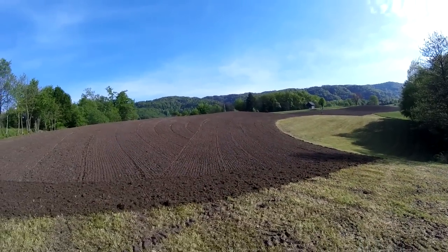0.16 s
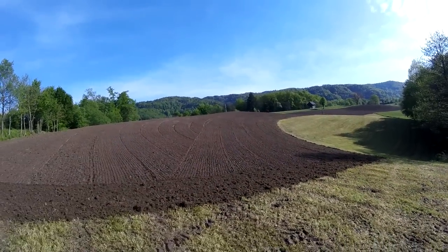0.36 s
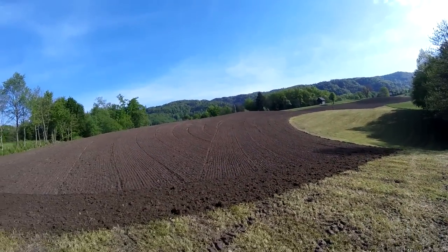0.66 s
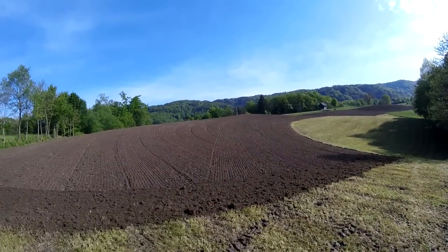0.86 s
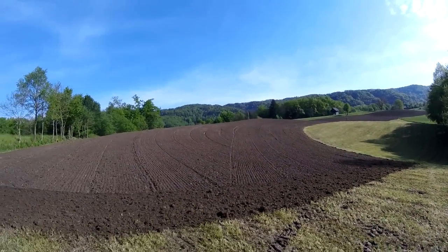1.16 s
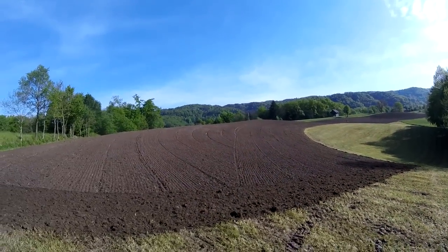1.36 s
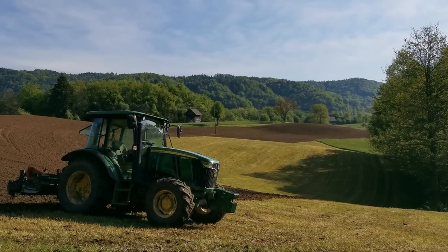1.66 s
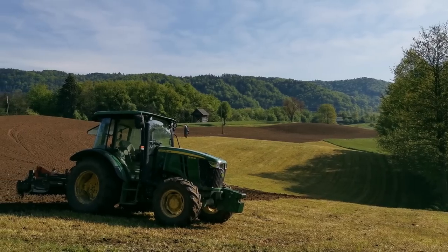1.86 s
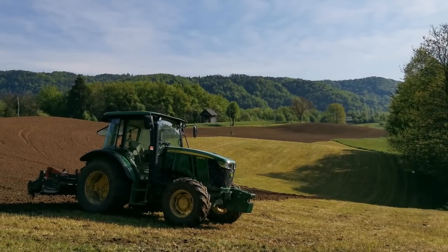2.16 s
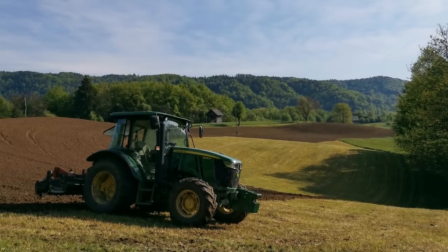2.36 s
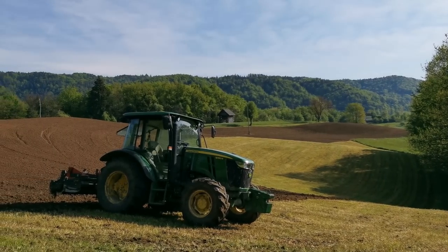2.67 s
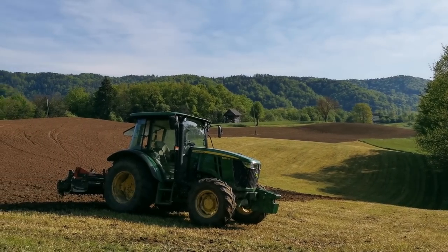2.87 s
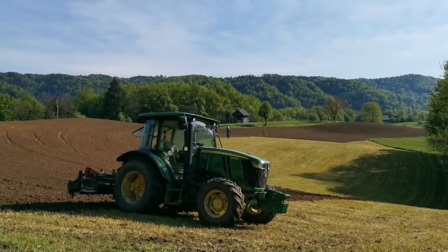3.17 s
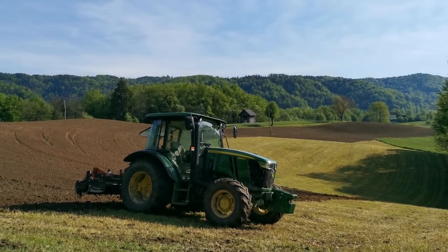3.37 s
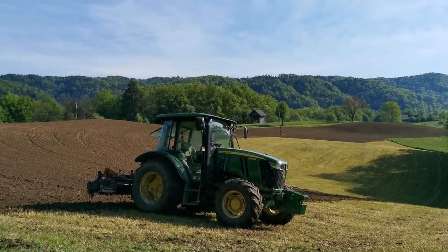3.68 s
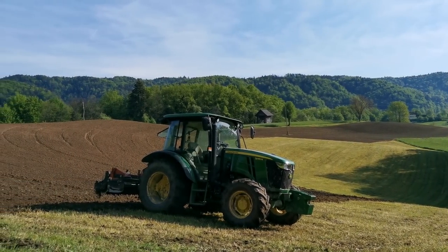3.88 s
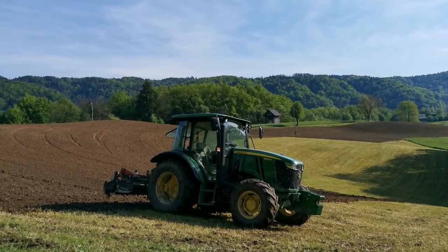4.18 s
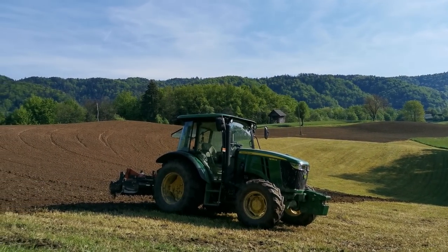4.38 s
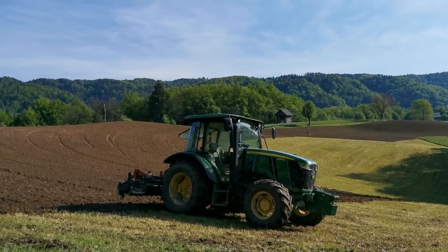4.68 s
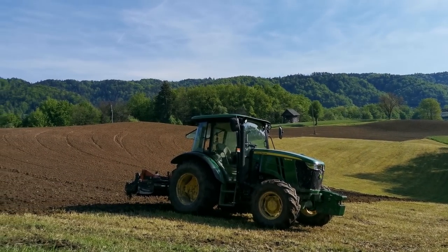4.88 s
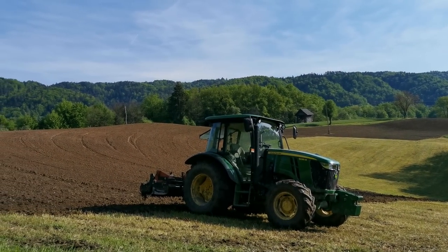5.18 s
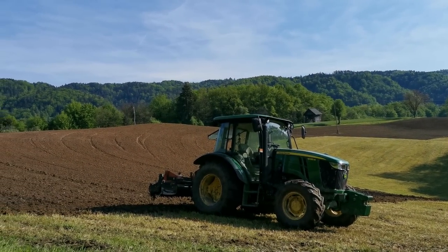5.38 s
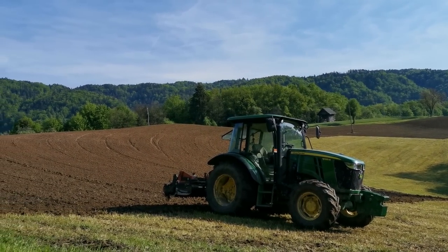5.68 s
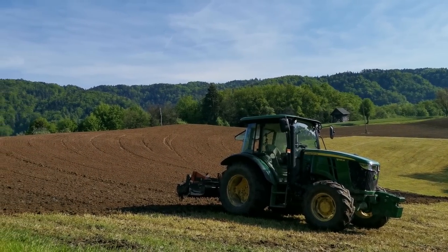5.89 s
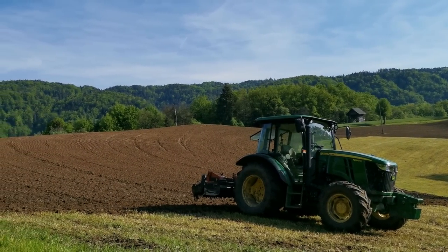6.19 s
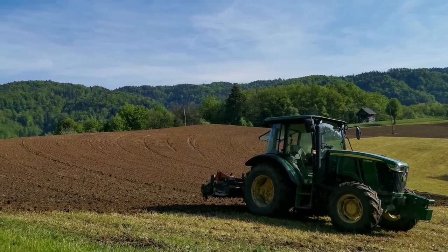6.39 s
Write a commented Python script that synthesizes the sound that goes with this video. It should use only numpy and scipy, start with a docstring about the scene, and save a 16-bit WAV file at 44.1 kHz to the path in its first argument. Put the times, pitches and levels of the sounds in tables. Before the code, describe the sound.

In an open field, a diesel tractor pulls a harrow close to the microphone, its exhaust droning and engine roaring, with a gear whine, a faint turbo whistle and a little wind rumble. After about a second and a half, the sound cuts from mono to stereo. The tractor now idles farther off, quieter, with puffing exhaust, fine ticking and a ringing knock, creeping slightly to the right.

```python
"""An open field, where a four-cylinder diesel tractor is heard in two scenes.
First it pulls a harrow close by, in mono: the exhaust drones, the engine roars with every firing,
gear teeth whine, the turbocharger whistles and a little wind rumbles.
Then, abruptly, it idles farther off, in stereo, creeping past to the right: the exhaust puffs,
the fuel injectors tick, and the burning fuel knocks in a ringing clatter."""
import sys
import numpy as np
from scipy import signal
from scipy.fft import rfft, irfft, next_fast_len
from scipy.io import wavfile
from scipy.ndimage import map_coordinates

SR = 44100
rng = np.random.default_rng(int(sys.argv[2]) if len(sys.argv) > 2 else 0)


def materialize(psi):
    """Save the field psi as 16-bit PCM at rate SR to the path in sys.argv[1].

    A 1-D psi becomes a single channel; in a 2-D psi each row is a channel.
    """
    bounded = np.clip(np.atleast_2d(psi).T, -1, 1)
    quanta = np.round(bounded * 32767).astype(np.int16)
    wavfile.write(sys.argv[1], SR, quanta)


N = 288414
SWITCH_S = 1.458  # the working engine gives way to the idling one
LOAD_HZ, IDLE_HZ = 51.1, 30.0  # firings a second

# how hard each of the four cylinders fires: level/dB
CYLINDER_LEVELS = [-0.19, 0.27, -0.28, -0.26]
# ring of an injector needle snapping shut: f/Hz, width/Hz, level/dB
NEEDLE_MODES = [(9300, 900, 0), (10800, 1300, -4), (12700, 1800, -9)]


def amp(db):
    """Turn decibels into a gain."""
    return 10 ** (np.asarray(db) / 20)


def unit(x):
    """Scale x to an average size (rms) of 1."""
    return x / np.sqrt(np.mean(x ** 2) + 1e-20)


def along(points, hz):
    """Read between (f/Hz, value) points on a log frequency axis."""
    f, values = np.transpose(points)
    return np.interp(np.log(hz + 1), np.log(f + 1), values)


def clock():
    """The time of every sample, in seconds."""
    return np.arange(N) / SR


def wobble(rate):
    """A smooth curve through rate random values a second."""
    return map_coordinates(rng.standard_normal(int(N * rate / SR) + 4), [clock() * rate])


def gate(start, length, edge):
    """A gain that rises for edge seconds before start, holds for length, then falls."""
    t = clock() - start
    return np.clip(1 + np.minimum(t, length - t) / edge, 0, 1)


def bump(at_s, span_s):
    """A bell curve in time, like a beam of sound sweeping past the listener."""
    return np.exp(-((clock() - at_s) / span_s) ** 2)


def filtered(x, response):
    """Scale each frequency in x by response(hz)."""
    size = next_fast_len(N + SR // 2)
    return irfft(rfft(x, size) * response(np.fft.rfftfreq(size, 1 / SR)), size)[..., :N]


def coloured(x, spectrum):
    """Shape x with a (f/Hz, level/dB) curve, then scale it to rms 1."""
    return unit(filtered(x, lambda hz: amp(along(spectrum, hz))))


def above(hz, corner_hz):
    """The share of power that passes a steep filter which cuts the lows."""
    return 1 / (1 + (corner_hz / (hz + 1)) ** 8)


def resonance(f, hz, width):
    """How one mode (a ringing pitch, hz) responds at the frequencies f."""
    return 1j * f * width / (hz * hz - f * f + 1j * f * width)


def ringing(x, modes):
    """x plus the ring it stirs up in the modes."""
    return filtered(x, lambda f: 1 + sum(amp(db) * resonance(f, hz, width) for hz, width, db in modes))


def whine(hz, width):
    """A fuzzy tone: a narrow band of noise around hz."""
    angle = 2 * np.pi * hz * clock()
    return wobble(width) * np.cos(angle) + wobble(width) * np.sin(angle)


def stereo(pair):
    """Blend two unrelated signals so the ears hear alike in the bass, apart in the treble."""
    # how alike the ears are: f/Hz, likeness (1 = the same)
    likeness = [(100, 1), (700, 1), (1300, 0.9), (2400, 0.41), (3500, 0.22), (4500, 0.43), (8000, 0)]
    turn = lambda hz: np.arccos(np.clip(along(likeness, hz), -1, 1)) / 2
    mid, side = filtered(pair, lambda hz: np.array([np.cos(turn(hz)), np.sin(turn(hz))]))
    return np.array([mid + side, mid - side])


def vibration(firing, repeat, count=4):
    """Noise whose metallic part partly repeats every count firings; firing is the running count."""
    size = int(count * N / (firing[-1] - firing[0]))
    pattern = map_coordinates(rng.standard_normal(size), [firing % count / count * size],
                              mode="grid-wrap")
    share = lambda hz: np.clip(repeat, 0, 1) * above(hz, corner_hz=440)
    fresh = filtered(rng.standard_normal(N), lambda hz: np.sqrt(1 - share(hz)))
    return filtered(pattern, lambda hz: np.sqrt(share(hz))) + fresh


def blows(firing, scatter_db):
    """The strength of each firing, set by its cylinder and by chance."""
    number = np.floor(firing + .5).astype(int)
    size_db = np.resize(CYLINDER_LEVELS, 512) + scatter_db * rng.standard_normal(512)
    return amp(size_db[number])


def stroke(firing, onset, rise, decay, floor_db):
    """A gain that rises at each firing, then fades toward a floor; times are in firing periods."""
    age = (firing - onset) % 1
    pulse = lambda a: np.minimum(a / rise, 1) * np.exp(-np.maximum(a - rise, 0) / decay)
    return np.sqrt(pulse(age) ** 2 + pulse(age + 1) ** 2 + amp(floor_db) ** 2)


def struck(envelope, modes):
    """Ringing metal: noise tuned to the modes, as loud as the envelope says."""
    power = lambda f: sum(amp(db) ** 2 * abs(resonance(f, hz, width)) ** 4 for hz, width, db in modes)
    noise = stereo(rng.standard_normal((2, N)))
    return envelope * unit(filtered(noise, lambda f: np.sqrt(power(f))))


def strikes(firing, cylinder_db, modes, onset, rise_s, t60):
    """One strike on metal per idle firing, fading at a rate of 60 dB in t60 seconds."""
    number, age = np.divmod(firing - onset, 1)
    age_s = age / IDLE_HZ
    size_db = np.resize(cylinder_db, 512) + 1.5 * rng.standard_normal(512)
    fade = amp(size_db[number.astype(int) + 1] - 60 * age_s / t60)
    return unit(struck(fade * np.minimum(age_s / rise_s, 1), modes))


def impacts(rows, modes, t60, rise_s=.0006):
    """Single (t/s, level/dB) blows on metal that rise suddenly and die away."""
    t = clock()
    envelope = sum(amp(db - 60 * np.maximum(t - s, 0) / t60) * np.clip((t - s) / rise_s, 0, 1)
                   for s, db in rows)
    return struck(envelope, modes)


def air():
    """A faint hiss over the field, and a light breeze that differs from ear to ear."""
    # colour of the breeze: f/Hz, level/dB
    breeze = [(10, -8), (30, -3), (90, 10), (200, -19), (800, -52)]
    hiss = amp(-67.5) * rng.standard_normal((2, N))
    return hiss + amp(-56.5) * coloured(rng.standard_normal((2, N)), breeze)


def wind():
    """Moving air makes a low, wavering rumble."""
    # colour of the wind: f/Hz, level/dB
    rumble = [(5, -20), (14, -1), (30, -7), (50, -6), (100, -38), (400, -73)]
    return amp(-33 + wobble(1.5)) * coloured(rng.standard_normal(N), rumble)


def shafts():
    """Turning shafts give off weak, wavering whines."""
    # the whines: f/Hz, width/Hz, level/dB
    whines = [(1054, 14, -48), (1152, 30, -49), (1385, 14, -52), (1595, 28, -46.5), (1605, 130, -46),
              (2950, 200, -55), (3280, 220, -57), (6450, 300, -58)]
    return sum(amp(db) * whine(hz, width) for hz, width, db in whines)


def squeaks():
    """Metal gives short, thin squeaks."""
    # the squeaks: t/s, length/s, f/Hz, level/dB
    events = [(.18, .03, 4560, -54), (0.263, .09, 4580, -54), (.27, .03, 4790, -50), (.55, .05, 4800, -52),
              (.74, .05, 4530, -50), (0.828, 0.088, 4810, -51.5)]
    return sum(amp(db) * gate(s, length, edge=.025) * whine(hz, width=220)
               for s, length, hz, db in events)


def turbocharger():
    """The turbocharger whistles faintly, and louder in fits."""
    # the fits: t/s, length/s, relative level/dB
    fits = [(0.195, 0.44, -48.5), (0.727, 0.19, -47)]
    boost = amp(-55.5) + sum(amp(db) * gate(s, length, edge=.04) for s, length, db in fits)
    return boost * amp(1.1 * wobble(22) - 3.5) * whine(hz=4720, width=560)


def gears(firing):
    """Gear teeth meet in step with the engine and sing louder once they take the load."""
    engage_s, rise_s, teeth_per_firing = .42, .04, 13.75
    slack_db, loaded_db, ease_db_per_s = -42, -33.6, 2.6
    since = np.maximum(clock() - engage_s, 0)
    loaded = np.minimum(since / rise_s, 1)
    level_db = slack_db + loaded * (loaded_db - slack_db) - ease_db_per_s * since
    # the teeth meet a little unevenly, in timing and in force
    tone = np.sin(2 * np.pi * teeth_per_firing * firing + .62 * wobble(55))
    return np.sqrt(2) * amp(level_db + 2.4 * wobble(35.3)) * tone


def needle_snaps(firing):
    """An injector needle snaps shut for every firing."""
    # strength by cylinder: level/dB
    strengths = [-2, -4, 0, 0]
    snap = strikes(firing, strengths, NEEDLE_MODES, onset=.62, rise_s=.0006, t60=.035)
    return amp(-72.8) * snap * amp([[3], [-3]])  # left and right ear


def injector_tick(firing):
    """One injector line ticks louder than the rest, clearest while it faces the listener."""
    # strength by cylinder: level/dB
    strengths = [-4, 0, -9, -5]
    # ring of the line: f/Hz, width/Hz, level/dB
    modes = [(6950, 320, -3), (7700, 340, 0)]
    tick = strikes(firing, strengths, modes, onset=.63, rise_s=.0012, t60=.035)
    facing = .3 + .6 * bump(at_s=4.25, span_s=1.2)
    return amp(-64.5) * facing * tick * amp([[-3.5], [3.5]])


def block_ping(firing):
    """Hard-burning fuel pings the block, clearest while the hardest cylinder faces the listener."""
    # strength by cylinder: level/dB
    strengths = [0, -4, -11, -10]
    # ring of the ping: f/Hz, width/Hz, level/dB
    modes = [(1920, 200, -4.5), (3360, 380, 1.5), (3880, 200, -4), (4600, 300, -1.5), (4940, 220, -3)]
    ping = strikes(firing, strengths, modes, onset=.79, rise_s=.003, t60=.045)
    facing = .19 + .7 * bump(at_s=2.5, span_s=1.7)
    return amp(-54) * facing * ping * amp([[-1.5], [1.5]])


def side_knock(firing):
    """The side of the block knocks more clearly as it comes round to the listener."""
    # ring of the side: f/Hz, width/Hz, level/dB
    modes = [(1410, 80, 0), (2020, 120, 2), (2660, 160, -3), (2930, 120, -5), (4400, 160, -4),
             (4700, 200, -2), (5130, 260, -2)]
    knock = strikes(firing, CYLINDER_LEVELS, modes, onset=.78, rise_s=.003, t60=.06)
    return amp(-53.5) * bump(at_s=5.9, span_s=1.4) * knock


def hard_firings():
    """Now and then one firing knocks or snaps harder than the rest."""
    # the hardest knocks: t/s, level/dB
    knock_times = [(1.63, -41), (1.76, -42), (2.124, -44.5), (2.392, -44), (2.523, -41), (2.925, -44),
                   (3.093, -41), (3.593, -41), (4.16, -43.5)]
    # what they ring: f/Hz, width/Hz, level/dB
    knock_modes = [(1250, 500, -5), (1950, 500, -1), (3420, 800, -4), (4630, 700, 0)]
    # the hardest needle snaps: t/s, level/dB
    snap_times = [(2.689, -53), (3.021, -56), (3.621, -56), (3.854, -58), (4.689, -56), (5.82, -58),
                  (6.489, -57)]
    knocks = impacts(knock_times, knock_modes, t60=.045) * amp([[-1], [1]])
    snaps = impacts(snap_times, NEEDLE_MODES, t60=.022) * amp([[3], [-3]])
    return knocks + snaps


def injectors(firing, t60, scatter_db):
    """A snap just before each firing sets the injectors and fuel lines ringing."""
    # their loudest modes: f/Hz, width/Hz, level/dB
    fuel_lines = [(6700, 160, -10), (7600, 270, 3.5), (9060, 270, -12), (11140, 300, -5)]
    number = np.floor(firing - .62 + .003 * wobble(24))
    size_db = scatter_db * wobble(30) + .74 * np.cos(np.pi * (firing - .6) / 2)
    snaps = np.diff(number, prepend=number[0]) * amp(size_db)
    t = np.arange(SR // 10) / SR
    ring = rng.standard_normal((2, len(t))) * amp(-60 * t / t60)  # countless modes blur into noise
    return unit(ringing(signal.fftconvolve(snaps[None], ring, axes=1)[:, :N], fuel_lines))


def turning(clatter):
    """The clatter changes colour as the tractor turns away and its covers beam their ring past."""
    # change of colour once turned: f/Hz, gain/dB
    change = [(1400, 0), (2000, 1.5), (2350, 1), (2750, 4), (3400, -4), (4100, 1), (4800, 2.5), (6000, 3),
              (6900, -3), (8400, 5), (9300, -4.5), (10100, 0), (10800, 8.5), (12600, -6.5), (14500, 1)]
    # beams from the covers: f/Hz, width/Hz, gain/dB, t/s, half length/s
    covers = [(1396, 50, -3.5, 5.4, 1.4), (1870, 110, -7, 4.4, 1), (2680, 280, -1.5, 6.7, 1.2),
              (3900, 99, -5, 2.8, 0.72), (4600, 170, -12, 6.5, 0.98)]
    turned = filtered(clatter, lambda hz: amp(along(change, hz)))
    progress = np.interp(clock(), [3.0, 5.9], [0, 1])
    blend = (1 - progress) * clatter + progress * turned
    return blend + sum(amp(db) * bump(at, span) * filtered(blend, lambda f: resonance(f, hz, width))
                       for hz, width, db, at, span in covers)


def creeping(pair):
    """As the tractor moves to the right, its sound reaches the left ear later."""
    lag_s = np.interp(clock(), [1.5, 6.5], [-.00003, .00014])
    left = map_coordinates(pair[0], [(clock() - lag_s) * SR], mode="nearest")
    return np.array([left, pair[1]])


def idle_clatter(firing):
    """Injectors and valves tick in the high treble; below that, the burning fuel knocks."""
    # ringing peaks in the engine's clatter: f/Hz, width/Hz, level/dB
    clatter_peaks = [(970, 7.7, -2), (1168, 38, 1.5), (1402, 16, 0), (1631, 52, 0), (1920, 140, -1),
                     (2044, 19, -2), (2306, 79, 3), (2663, 81, 1), (2977, 80, 1.5), (3390, 65, -13),
                     (3960, 21, 0.5), (4300, 39, 1), (4660, 36, 4), (5030, 90, -8)]
    # colour of the clatter at each ear: f/Hz, level/dB
    left_colour = [(400, -40), (1000, -5), (2000, -4), (2600, -13), (3350, 0), (4500, -10), (4900, -14.5),
                   (5800, -15), (7300, -21), (7800, -22), (8300, -20.5), (9200, -11.5), (10200, -20.5),
                   (12600, -19), (15000, -42)]
    right_colour = [(400, -35), (1000, -5.5), (1500, -3.5), (2000, -0.5), (2900, -10.5), (3700, -3),
                    (4950, 1.5), (5600, -13.5), (6200, -14.5), (6900, -7), (7800, -14.5), (8600, -33),
                    (9500, -53), (11000, -42)]
    rattle = lambda repeat, count: stereo(np.array([vibration(firing, repeat, count) for _ in range(2)]))
    grain = amp(.21 * wobble(500))  # many small impacts inside each blow
    metal = rattle(repeat=.36, count=4) + .27 * rattle(repeat=.91, count=1)
    ignition = firing + .029 * wobble(30)  # the fuel catches a little early or late
    burn = stroke(ignition, onset=.49, rise=.37, decay=.47, floor_db=-8)
    knock = unit(ringing(metal * grain * burn * blows(ignition, scatter_db=.6), clatter_peaks))
    closing = stroke(firing, onset=.6, rise=.17, decay=.36, floor_db=-8)
    valves = unit(rattle(repeat=.22, count=4) * closing * blows(firing, scatter_db=1.5))
    tick = .54 * injectors(firing, t60=.24, scatter_db=1.5) + .75 * valves
    high = lambda hz: above(hz, corner_hz=6040)
    lows = filtered(knock, lambda hz: np.sqrt(1 - high(hz)))
    highs = filtered(tick, lambda hz: np.sqrt(high(hz)))
    left, right = lows + highs
    return np.array([amp(-47) * coloured(left, left_colour), amp(-45.5) * coloured(right, right_colour)])


def exhaust_tones(firing, orders, smear_rad, waver_db):
    """Tones add up to one pressure dip per firing, rippled by the pipe's echo and smeared at random."""
    echo_periods, ripple_rad, turn_rad = .24, .95, .5
    echo = lambda k: ripple_rad * np.cos(2 * np.pi * k * echo_periods - turn_rad)
    lags = smear_rad * rng.standard_normal(len(orders))
    wave = lambda k, lag: -np.sqrt(2) * np.cos(2 * np.pi * k * firing + echo(k) + lag)
    return sum(amp(db + waver_db * wobble(6)) * wave(k, lag) for (k, db), lag in zip(orders, lags))


def idle_exhaust(firing):
    """Slow firings leave as separate puffs, each with a dull chug from pipe and block."""
    # tones of the puffs: multiple of the firing rate, level/dB
    orders = [(1, -54), (2, -46), (3, -48.8), (4, -52.3), (5, -52.5), (5.5, -56), (6, -46), (7, -49.7),
              (7.5, -57), (8, -58), (9, -52.5), (9.5, -54), (10, -47), (10.5, -56), (11, -54), (12, -58),
              (13, -57), (13.5, -54.5), (17, -60.5), (18, -55)]
    # colour of the chug: f/Hz, level/dB
    chug_colour = [(15, -26), (45, -6), (95, 0.5), (170, 1), (250, -3), (320, -1), (450, -6), (560, -6.5),
                   (680, -4.5), (820, -12), (1100, -29.5), (3000, -72)]
    uneven = firing - .055 + .003 * wobble(30)
    puffs = exhaust_tones(uneven, orders, smear_rad=.3, waver_db=1) * blows(firing + .25, scatter_db=.6)
    noise = stereo(np.array([vibration(firing, repeat=.39), rng.standard_normal(N)]))
    swell = stroke(firing, onset=.63, rise=.43, decay=.91, floor_db=-2.5)
    chug = amp(-40.5) * coloured(noise * swell, chug_colour)
    return (puffs + chug) * amp([[.85], [-.85]])


def harrow_drag():
    """How many Hz the firing rate drops as the harrow bites deeper."""
    # the bites: t/s, drop/Hz
    bites = [(.678, .62), (1.43, .79)]
    return sum(drop * bump(s, span_s=.205) for s, drop in bites)


def working_drone(firing):
    """Under load, quick and slightly uneven firings merge into an exhaust drone."""
    # tones of exhaust and block: multiple of the firing rate, relative level/dB
    orders = [(1, -33), (2, -31.7), (2.25, -49), (2.5, -49), (3, -33.2), (3.25, -47), (3.5, -38.8),
              (3.75, -46), (4, -40.5), (5, -46), (6, -45), (7, -39.5), (7.75, -47), (8, -50), (8.5, -48),
              (8.75, -47), (9, -43), (9.5, -49), (11, -45), (12, -53), (14.75, -47.5), (15.75, -48),
              (16.75, -47), (17.75, -52), (19, -52), (22.5, -50)]
    # rise and fall of the drone: t/s, relative level/dB
    loudness = [(0, -25.5), (.14, -26.5), (.27, -25.5), (.37, -26), (.55, -25), (.9, -24.5), (1.12, -25.5),
                (1.3, -26), (1.41, -22.5), (1.45, -22)]
    level_db = np.interp(clock(), *np.transpose(loudness)) - .36
    uneven = firing + .26 + .005 * wobble(25)
    return amp(level_db) * unit(exhaust_tones(uneven, orders, smear_rad=2.4, waver_db=.9))


def working_roar(firing):
    """The shaking engine roars, throbbing with every firing and dipping a little as the harrow bites."""
    # colour of the roar: f/Hz, level/dB
    colour = [(35, -14), (65, 0.5), (200, -3.5), (290, -6), (420, -2), (640, -9), (1100, -8.5),
              (1400, -12.5), (1490, -12), (1620, -11.5), (2900, -19), (3800, -25), (4700, -25),
              (6600, -30.5), (8500, -43), (15000, -68.5)]
    metal = vibration(firing, repeat=.6) + .28 * vibration(firing, repeat=.94, count=1)
    throb_db = 1.55 * np.cos(2 * np.pi * firing) + .08 * np.cos(np.pi * firing / 2) + .55 * wobble(40.27)
    return amp(-27.5 - .8 * harrow_drag()) * coloured(metal * amp(throb_db), colour)


def scene():
    """The working tractor, then the idling one."""
    fast = np.cumsum(LOAD_HZ - harrow_drag()) / SR  # firings counted since the start
    slow = IDLE_HZ * clock()
    working = working_drone(fast) + working_roar(fast)
    working += gears(fast) + turbocharger() + squeaks() + shafts() + wind()
    idling = idle_exhaust(slow) + turning(idle_clatter(slow))
    idling += block_ping(slow) + injector_tick(slow) + needle_snaps(slow)
    idling += side_knock(slow) + hard_firings()
    first = np.clip(np.minimum(clock() / .00097, (SWITCH_S - clock()) / .0092), 0, 1)
    second = np.clip((clock() - SWITCH_S) / .0046, 0, 1)
    return first * working + second * (creeping(idling) + air())


def record(dry):
    """Cut off the very highest treble."""
    return filtered(dry, lambda hz: hz < 15700)


dry = scene()
out = record(dry)
materialize(out)
```